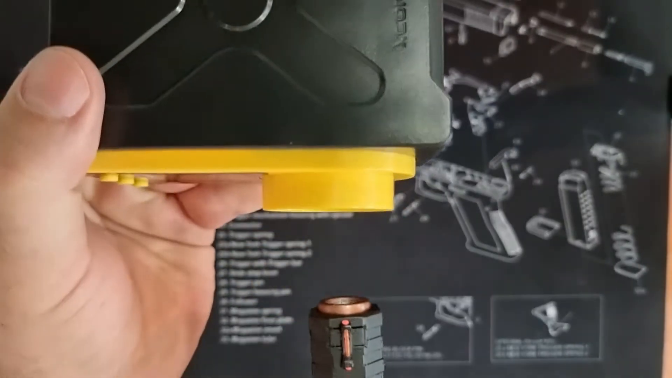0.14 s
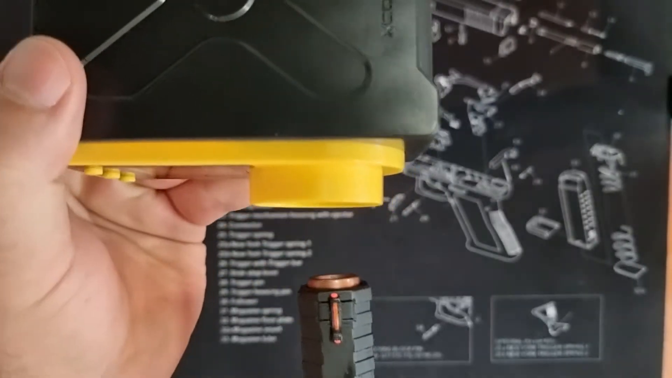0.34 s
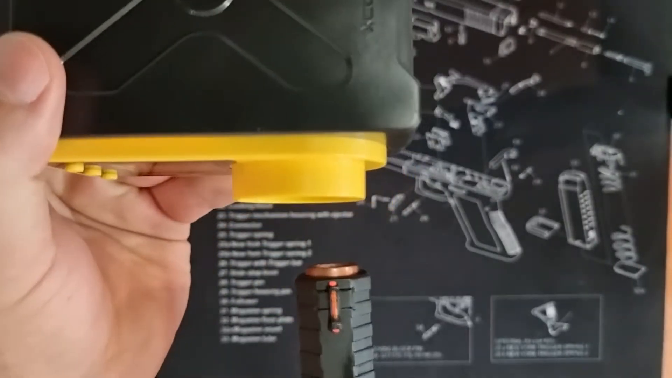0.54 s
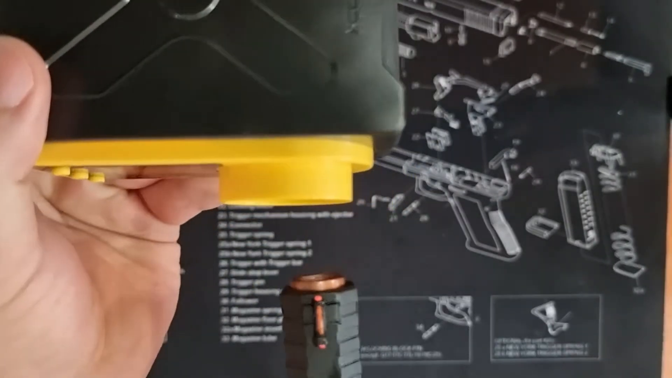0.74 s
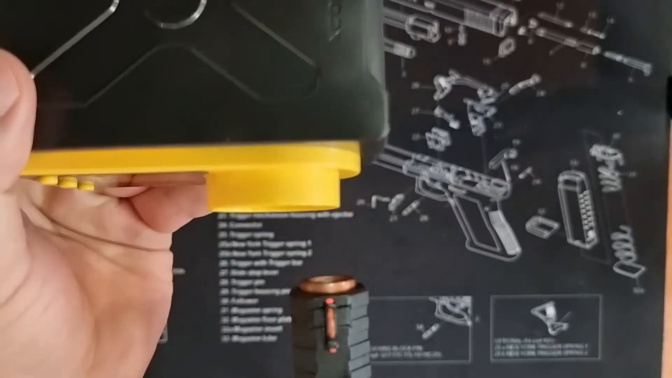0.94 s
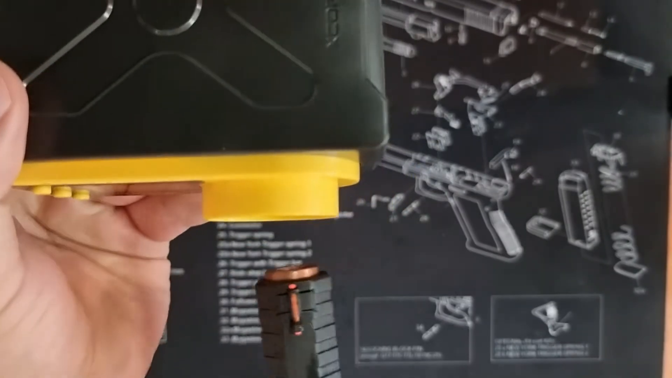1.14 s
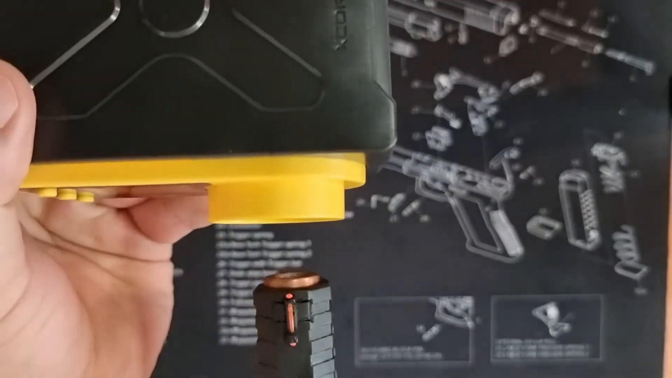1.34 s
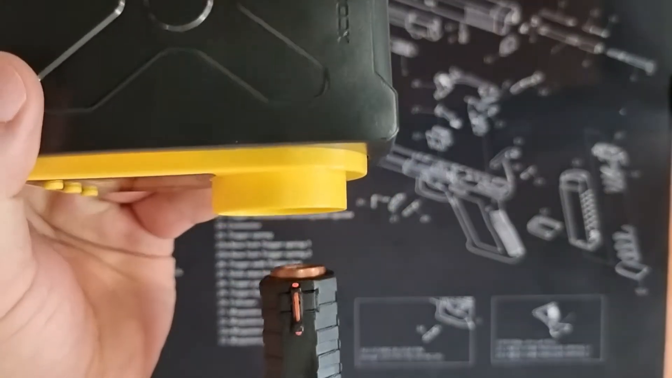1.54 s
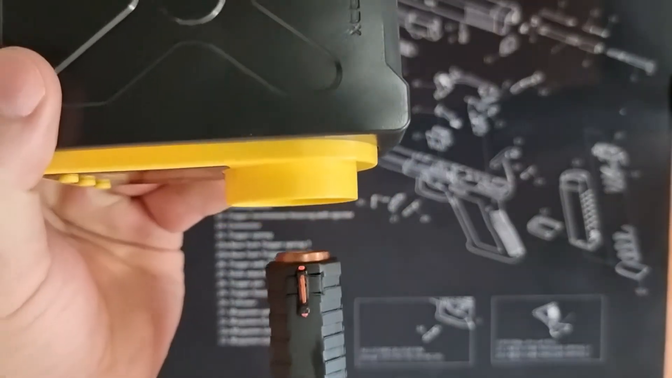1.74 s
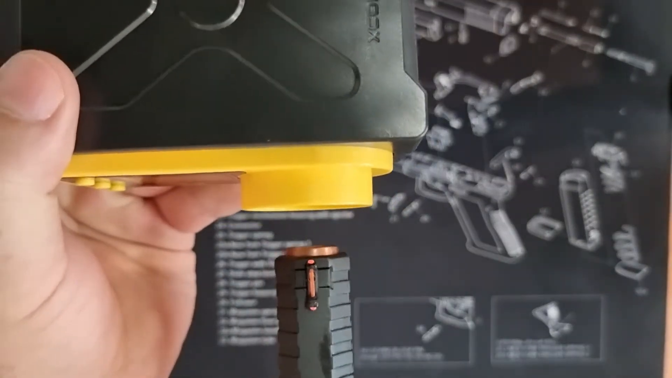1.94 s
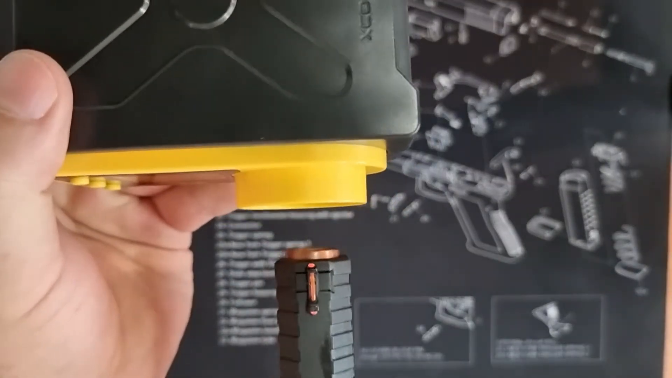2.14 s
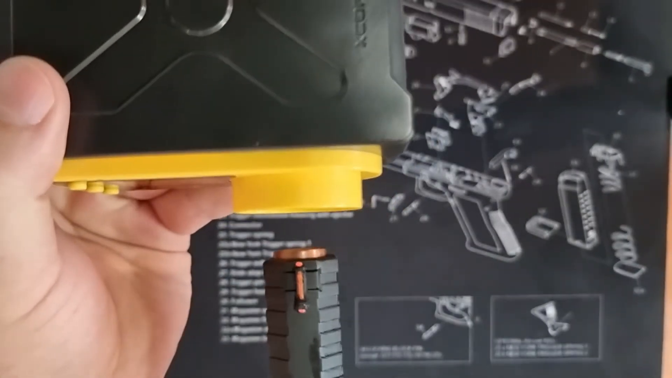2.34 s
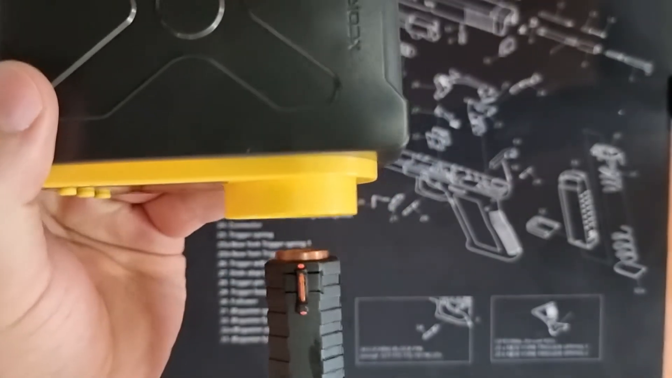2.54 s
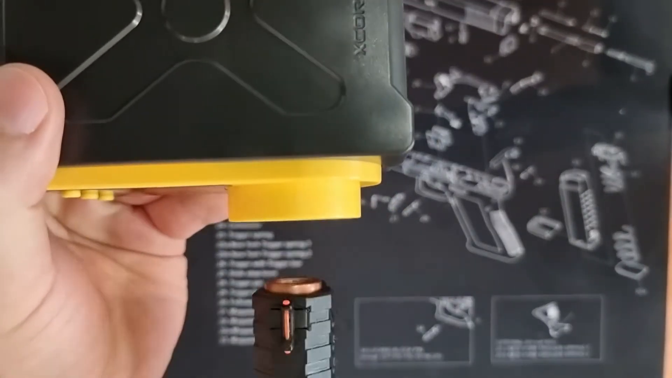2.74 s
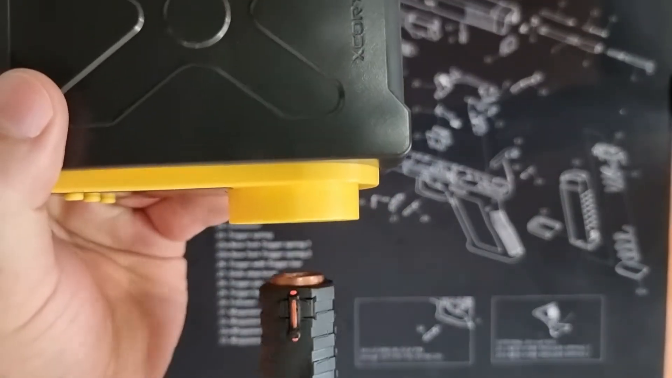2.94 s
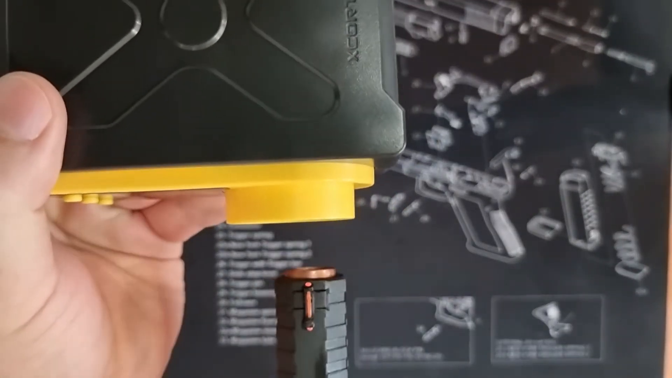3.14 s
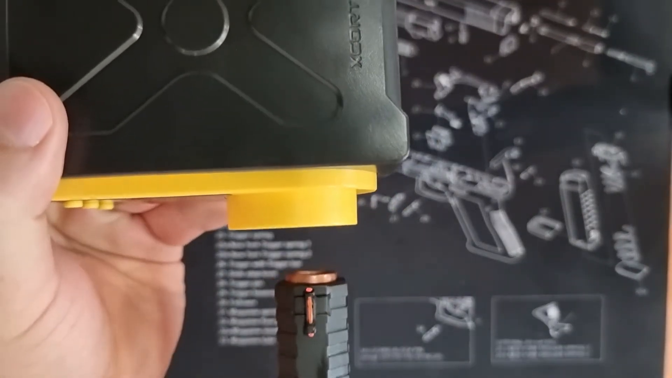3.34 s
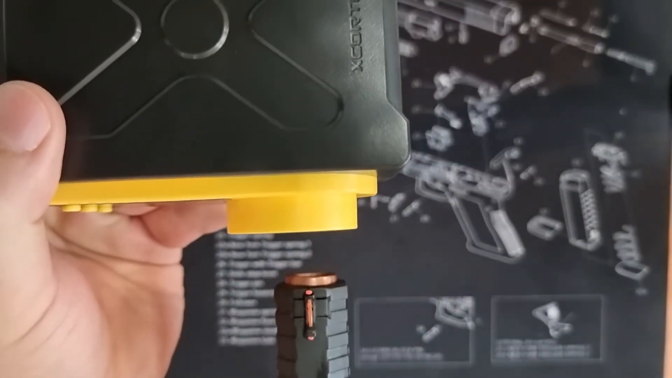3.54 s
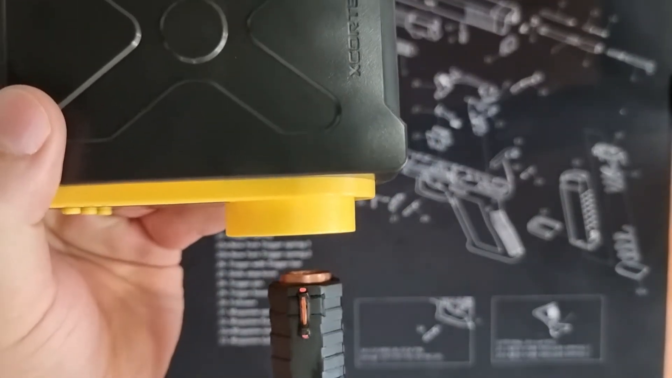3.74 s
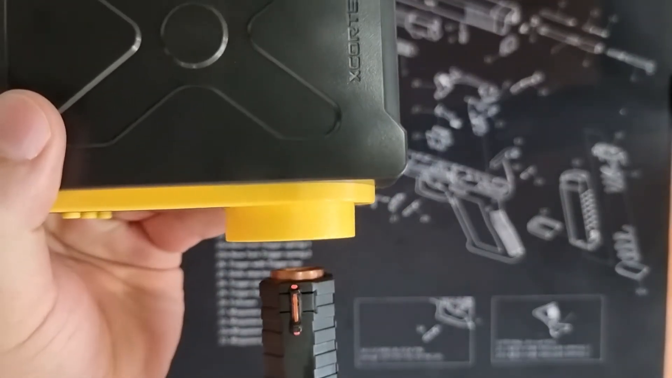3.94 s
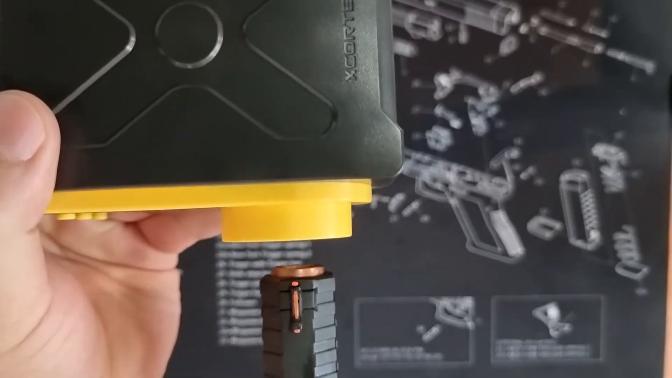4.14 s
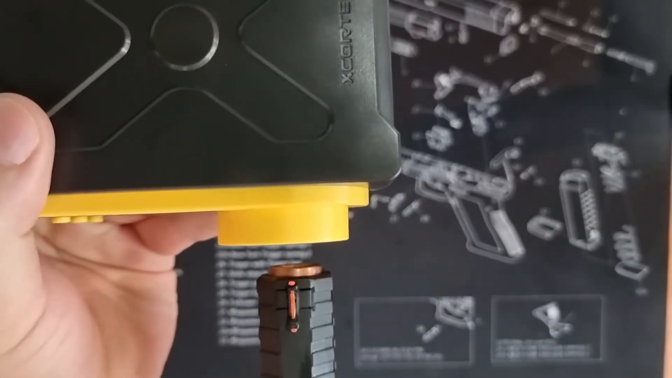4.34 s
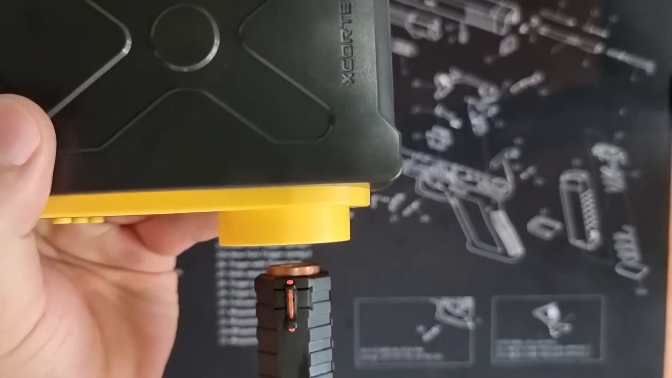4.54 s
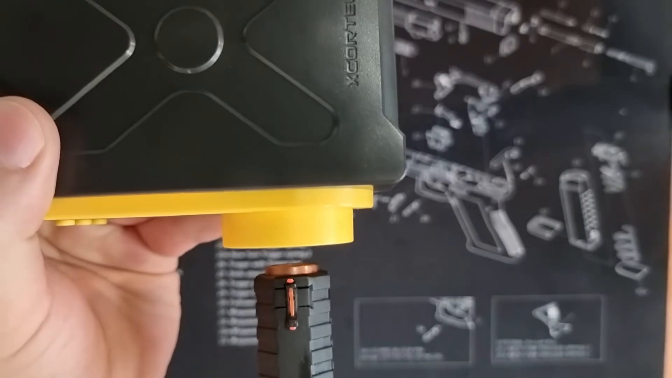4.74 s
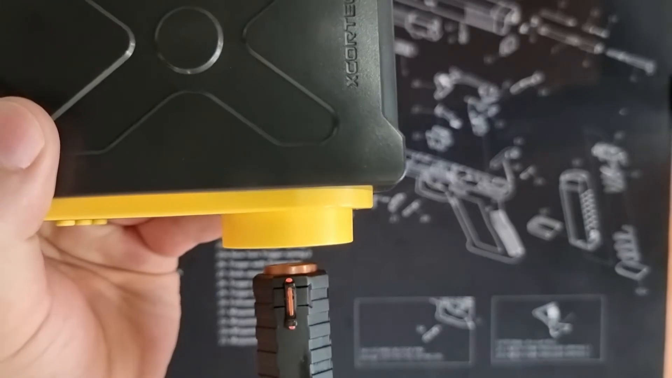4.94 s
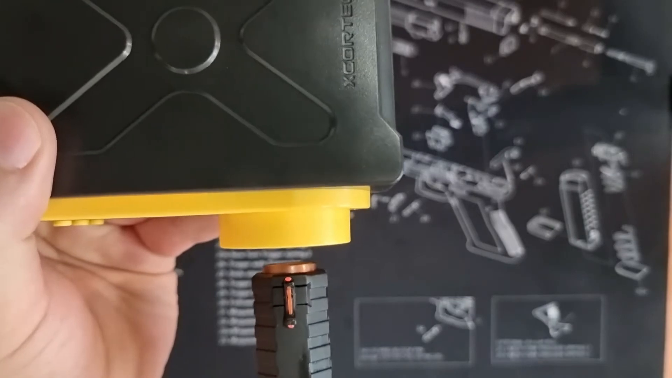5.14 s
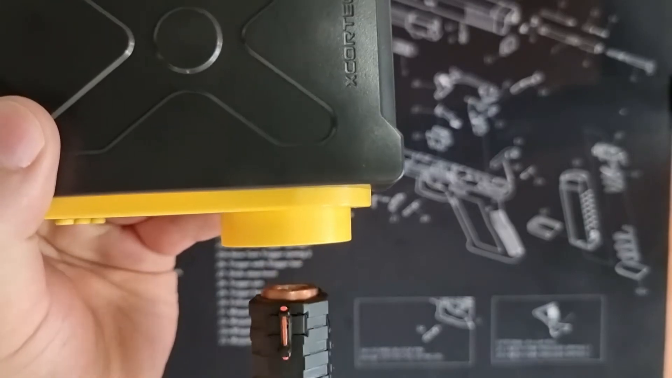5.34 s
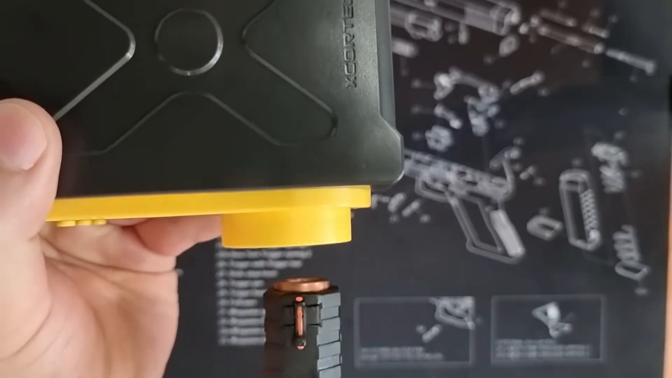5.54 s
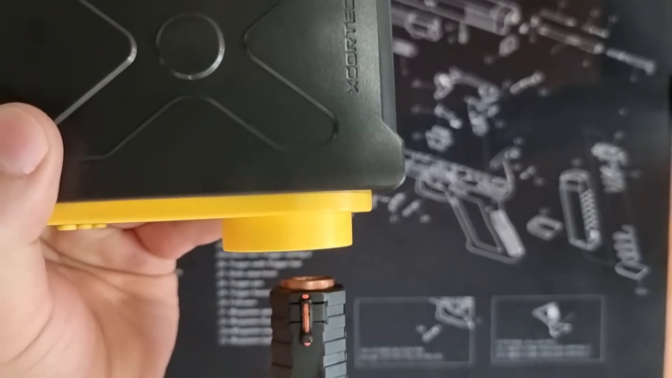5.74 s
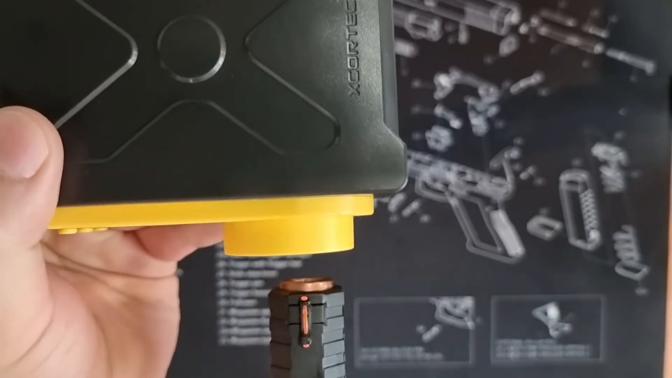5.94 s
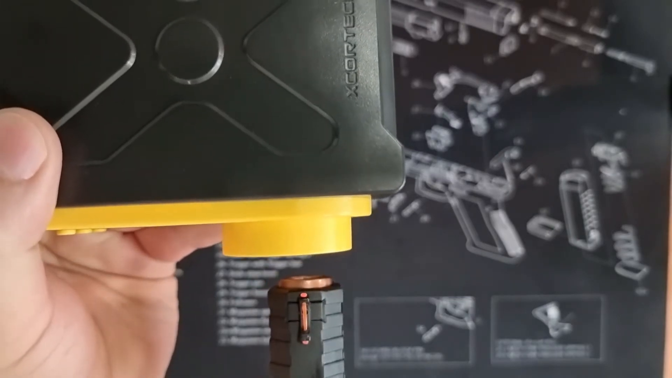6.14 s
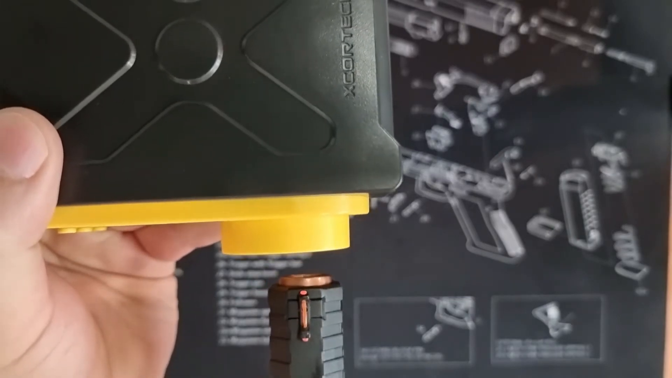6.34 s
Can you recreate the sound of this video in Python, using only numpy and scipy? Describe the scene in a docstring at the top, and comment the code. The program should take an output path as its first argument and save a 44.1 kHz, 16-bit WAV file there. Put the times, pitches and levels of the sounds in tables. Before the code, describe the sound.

A gas airsoft pistol clicks, then fires two sharp, hissing, clattering shots that ring through a hard room over a faint fan hum.

```python
"""A gas airsoft pistol is fired through a hand-held chronograph in a hard, ringing room, close to a phone.
A fan hums over room tone throughout: wandering sines and coloured noise. The trigger clicks first: ticks and rubs
ring steel resonances. At 2.55 s and 5.18 s come the shots: noise jets, slide blows that ring, puffs on the microphone
and decaying room sines. Knocks follow each; after the second the mechanism scrapes (noise bursts) and its latch clicks.
Sources excite decaying-noise echoes; the phone's gain drops on loud sound and slowly recovers."""
import sys
import numpy as np
from scipy import signal
from scipy.fft import rfft, irfft, next_fast_len
from scipy.io import wavfile
from scipy.ndimage import uniform_filter1d, map_coordinates

SR = 44100
rng = np.random.default_rng(int(sys.argv[2]) if len(sys.argv) > 2 else 0)


def dump_mix(stems):
    """Bounce the given channels to the path in sys.argv[1] as a 16-bit WAV at rate SR."""
    frames = np.atleast_2d(stems).T  # one column per channel
    limited = np.clip(frames, -1, 1)  # hard clip at full scale
    pcm = np.round(limited * 32767).astype(np.int16)
    wavfile.write(sys.argv[1], SR, pcm)


N = 281490
TIME = np.arange(N) / SR  # s

# Shots: valve fully open t/s, relative jet level/dB, open time/s, breech delay/s,
# relative breech hiss level/dB, relative boom level/dB
SHOTS = [(2.551, -12.5, 0.068, 0.044, -14, -1), (5.18, -13.5, 0.087, .054, -8, -7)]
# Left-right likeness of diffuse sound: f/Hz, likeness/1
ROOM_ALIKE = [(100, .88), (300, .3), (700, .15), (1500, .03), (16000, 0)]


def shots(ring_db=-14, wet_db=-1):
    """Gas hisses out while the slide slams back and forward and rings."""
    # Blows of valve and slide: t/s, relative level/dB
    blows = [(2.551, -8.5), (2.562, 1), (2.5695, -17), (2.576, -1.5), (2.607, -6.5), (5.179, -14),
             (5.1862, -1.5), (5.1942, -0.5), (5.2015, -5), (5.222, -14.5), (5.243, -12.5)]
    # Spectrum of jet and blows: f/Hz, relative level per Hz/dB
    gas = [(20, -10), (60, -3.5), (136, 1), (300, -6.5), (460, 1), (680, -3), (1300, -3), (1900, -6),
           (2800, -2.5), (4860, -4), (7000, -7), (9200, -11.5), (12500, -6), (15600, -10.5)]
    # Spectrum of breech hiss: f/Hz, relative level per Hz/dB
    hiss = [(4000, -31), (9000, -9.5), (12000, 1), (15500, 0)]
    # Slide modes: f/Hz, relative level/dB, t60/s
    steel_modes = [(2947, -18.5, 0.12), (3114, -7, .15), (3226, -8.5, 0.15), (3790, -9.5, .12),
                   (7830, -3.5, .1), (13900, 0, .07), (14500, 2, .07), (15570, 6, 0.064)]
    blow_t60_s = 0.016

    jet = jet_level() * noise(gas)
    cracks = strikes(blows, blow_t60_s) * noise(gas)
    report = blend(jet + cracks, ROOM_ALIKE) + breech_level() * noise(hiss)
    report = report + amp(ring_db) * ringing(report, steel_modes)
    # each shot has its own draw of diffuse echoes
    halves = [TIME < TIME[-1] / 2, TIME >= TIME[-1] / 2]
    echoes = sum(room(report * half) for half in halves)
    return report + amp(wet_db) * echoes


def jet_level():
    """The gas flow rises fast, holds while the valve is open and drains more slowly."""
    rise_db_per_s, release_db_per_s = 1452.5, 267
    level = np.zeros(N)
    for open_s, db, hold_s, *_ in SHOTS:
        before_s = np.maximum(open_s - TIME, 0)
        after_s = np.maximum(TIME - open_s - hold_s, 0)
        level += amp(db - rise_db_per_s * before_s - release_db_per_s * after_s)
    return level


def breech_level():
    """A thin hiss swells and fades as the slide uncovers the breech."""
    half_s = 0.022  # centre to 1/e
    return sum(amp(db) * np.exp(-((TIME - open_s - delay_s) / half_s) ** 2)
               for open_s, _, _, delay_s, db, _ in SHOTS)


def boom():
    """Each shot sets the room's standing waves swinging; they build up and hum on, alike at both ports."""
    # Standing waves: f/Hz, relative level/dB, t60/s
    standing_waves = [(78, -27.5, .6), (126.7, -23, .85), (154.3, -25.5, .9), (212, -27.5, 0.54),
                      (378, -34.5, 1.2), (784, -42.5, 1.1), (1095, -38.5, 1.4)]
    delay_s, build_s = 0.02, 0.031  # blast crosses the room; waves swell

    out = np.zeros(N)
    for open_s, *_, boom_db in SHOTS:
        t = np.maximum(TIME - open_s - delay_s, 0)
        waves = sum(amp(db - 60 * t / t60) * np.sin(2 * np.pi * (hz * t + rng.random()))
                    for hz, db, t60 in standing_waves)
        out += amp(boom_db) * waves * (1 - np.exp(-t / build_s))
    return out


def puffs(eddy_db=-9, spread=3.5, wet_db=-12):
    """Each puff is a quick suction, a slow rebound and a swirl of eddies, mostly on the right port."""
    # Gas striking the ports: t/s, relative level/dB, time scale/s
    gusts = [(2.545, -18, 0.00033), (2.556, -11.5, 0.0014), (2.567, -3, 0.001), (5.16, -30.5, 0.0026),
             (5.171, -10.5, 0.0014), (5.1785, -1.5, 0.0011), (5.1809, -5, 0.0012), (5.192, -12, 0.00044)]
    # Turbulence spectrum: f/Hz, relative level per Hz/dB
    eddy_spectrum = [(20, -2), (70, 1.5), (200, -1.5), (450, -3), (900, -15), (2500, -33), (16000, -71)]
    left_db = -20.5  # sheltered port

    out, eddies = np.zeros((2, N)), noise(eddy_spectrum)
    for start_s, db, scale_s in gusts:
        u = np.maximum(TIME - start_s, 0) / scale_s
        pressure = u * (u - 2) * np.exp(1 - u)
        swirl = amp(eddy_db) * np.exp(-((TIME - start_s) / (spread * scale_s)) ** 2) * eddies
        out += amp([[db + left_db], [db]]) * (pressure + swirl)
    return out + amp(wet_db) * room(out.mean(axis=0, keepdims=True))


def trigger(tick_db=-3, rub_db=-6, rub_t60_s=0.005, rub_rise_s=0.0004,
            near_db=-10, wet_db=-20, rasp_db=-17, low_hz=1200):
    """Trigger, sear and latch snap: ticks and rubs ring steel in step; a broader rasp radiates into the room."""
    # Steel contacts of trigger, sear and latch: t/s, relative level/dB
    contacts = [(.452, -44), (1.105, -8.5), (1.108, -0.5), (5.138, -31.5), (6.103, -12.5), (6.108, -15)]
    # Resonances of these parts: f/Hz, width/Hz, relative level/dB
    steel_modes = [(3030, 600, 3), (5200, 750, 2.5), (9800, 1100, -2.5), (12570, 760, 3), (14900, 1300, -3)]
    # Rub spectrum reaching the room: f/Hz, relative level per Hz/dB
    rasp_spectrum = [(800, -26), (1800, -3.5), (3000, -8), (4000, -2.5), (5000, -6), (7500, -15.5),
                     (12500, -3.5), (16000, 0)]

    ticks = np.zeros(N)
    for t_s, db in contacts:
        ticks[round(t_s * SR)] += amp(db + tick_db)
    rub = strikes(contacts, rub_t60_s, rub_rise_s)
    excitation = ticks + amp(rub_db) * rub * rng.standard_normal((2, N))

    def steel(hz):
        """In-step resonances behind a second-order high-pass."""
        modes = sum(resonances([mode], hz) for mode in steel_modes)
        return modes * (1j * hz / (low_hz + 1j * hz)) ** 2

    click = filtered(excitation, steel)
    rasp = rub * noise(rasp_spectrum)
    return click + amp(near_db) * nearby(click) + room(amp(wet_db) * click + amp(rasp_db) * rasp)


def nearby(x, span_s=0.017):
    """The table and the hands scatter a dense cluster of early echoes."""
    t = TIME[:SR // 10]
    cluster = rng.standard_normal((2, len(t))) * (t / span_s) * np.exp(-(t / span_s) ** 4)
    return signal.fftconvolve(x, cluster / np.linalg.norm(cluster[0]), axes=1)[:, :N]


def handling(rise_s=0.0025, spring_t60_s=0.43, tick_db=3, tick_t60_s=0.014, wet_db=-3):
    """Metal parts tick and scrape as they catch, a spring buzzes on, the hand bumps the case."""
    # Mechanism sliding and catching: t/s, relative level/dB
    catches = [(5.865, -34), (5.938, -39), (6.038, -45.5), (6.058, -40.5), (6.102, -35), (6.352, -51.5)]
    # Hand on the plastic case: t/s, relative level/dB
    knocks = [(3.243, -39), (6.231, -37)]
    # Scrape spectrum: f/Hz, relative level per Hz/dB
    scrape_spectrum = [(500, -31), (1400, -10), (2800, -6.5), (4500, -9.5), (7000, -10), (9000, -16),
                       (12000, -12), (14400, -11), (15800, -5.5)]
    # Spring resonances: f/Hz, width/Hz, relative level/dB
    spring_modes = [(1430, 60, -7), (4130, 320, -3.5)]
    # Case spectrum: f/Hz, relative level per Hz/dB
    case_spectrum = [(20, 2), (120, -22), (500, -19), (1500, -30), (6000, -53), (16000, -50)]
    catch_t60_s, knock_t60_s = 0.25, 0.024
    spring_db = -7.5  # re catch level

    scrape_level = strikes(catches, catch_t60_s, rise_s)
    tick_level = amp(tick_db) * strikes(catches, tick_t60_s, rise_s)
    scrape = (scrape_level + tick_level) * noise(scrape_spectrum)
    spring = amp(spring_db) * strikes(catches, spring_t60_s, rise_s) * band_noise(spring_modes)
    thuds = strikes(knocks, knock_t60_s) * blend(noise(case_spectrum), ROOM_ALIKE)
    dry = scrape + spring + thuds
    return dry + amp(wet_db) * room(dry)


def room(x, build_s=0.0051):
    """Diffuse echoes build up, swell at the room's resonances and die fastest in the treble."""
    # Decay: f/Hz, t60/s
    decay_t60 = [(60, 0.48), (150, .9), (260, 0.7), (600, 1.07), (1100, 1.276), (1800, 1.24), (2850, 1.065),
                 (3600, 0.96), (5200, 0.78), (7000, .7), (9000, 0.47), (15000, 0.2)]
    # Echo colour: f/Hz, relative level/dB
    echo_gain = [(40, -15), (130, -1), (280, 0.5), (420, 1.5), (700, -1), (1100, -1.5), (1700, -2),
                 (2900, -0.5), (4200, -3), (7000, 2), (9500, -1), (15000, 4)]
    # Room resonances: f/Hz, width/Hz, relative level/dB
    room_modes = [(76, 12.04, 5.5), (140.3, 13, 2.5), (158, 20, 5.5), (228, 39, -3.5), (390, 31, 0),
                  (1110, 73, -4), (2900, 480, -3)]

    colour = lambda hz: amp(along(echo_gain, hz)) * (1 + np.abs(resonances(room_modes, hz)))
    coloured = filtered(rng.standard_normal((2, 2 * SR)), colour)
    hz, t, bins = signal.stft(coloured, SR, nperseg=512)
    decay = amp(-60 * t / along(decay_t60, hz)[:, None])
    tail = signal.istft(bins * decay, SR, nperseg=512)[1]
    tail = blend(tail * (1 - np.exp(-TIME[:tail.shape[1]] / build_s)), ROOM_ALIKE)
    return signal.fftconvolve(x, tail / np.linalg.norm(tail[0]), axes=1)[:, :N]


def fan(air_db=-56.0, drift=0.0017, flutter_db=4.0):
    """Steady room tone and the thin tones of a fan whose speed wanders a little."""
    # Fan tones: mean f/Hz, relative level/dB
    fan_tones = [(113, -77), (226, -73), (790.5, -67)]
    # Room tone spectrum: f/Hz, relative level per Hz/dB
    air_spectrum = [(25, -26), (55, -18.5), (82, -7), (117, -0.5), (200, -4), (270, -13), (380, -8),
                    (640, -12), (790, -6), (930, -12.5), (1500, -16), (3250, -24), (4500, -34.5),
                    (7300, -41), (8400, -49), (16000, -56)]
    # Room tone left-right likeness: f/Hz, likeness/1
    air_alike = [(60, 0.86), (180, 0.92), (550, 0.62), (1650, -0.26), (4970, -0.15), (15000, 0.33)]

    warped_s = np.cumsum(1 + drift * wobble(6)) / SR
    tones = sum(amp(db + flutter_db * wobble(9)) * np.sqrt(2) * np.sin(2 * np.pi * hz * warped_s)
                for hz, db in fan_tones)
    return blend(amp(air_db) * noise(air_spectrum), air_alike) + tones


def strikes(rows, t60_s, rise_s=0.00015):
    """Envelope of (t/s, level/dB) contacts that rise quickly and die away."""
    out, t = np.zeros(N + SR), TIME[:SR]
    for start_s, db in rows:
        out[round(start_s * SR):][:SR] += amp(db - 60 * t / t60_s) * (1 - np.exp(-t / rise_s))
    return out[:N]


def ringing(x, modes):
    """x rings metal modes, which reach each port with their own phase."""
    t = TIME[:SR]
    ring = sum(amp(db - 60 * t / t60) * np.sin(2 * np.pi * (hz * t + rng.random((2, 1))))
               for hz, db, t60 in modes)
    return signal.fftconvolve(x, ring / np.linalg.norm(ring[0]), axes=1)[:, :N]


def resonances(modes, hz):
    """Response of (f/Hz, width/Hz, level/dB) resonances; neighbours swing in opposite directions."""
    return sum((-1) ** k * amp(db) * 1j * hz * width / (centre ** 2 - hz * hz + 1j * hz * width)
               for k, (centre, width, db) in enumerate(modes))


def blend(pair, alike):
    """Mix two unrelated signals to a left-right likeness by frequency."""
    turn = lambda hz: np.arccos(np.clip(along(alike, hz), -1, 1)) / 2
    mid, side = filtered(pair, lambda hz: np.array([np.cos(turn(hz)), np.sin(turn(hz))]))
    return np.array([mid + side, mid - side])


def noise(spectrum):
    """Two unrelated coloured noises of rms 1."""
    return unit(filtered(rng.standard_normal((2, N)), lambda hz: amp(along(spectrum, hz))))


def band_noise(modes):
    """Two unrelated noises of rms 1 in broad resonances."""
    return unit(filtered(rng.standard_normal((2, N)), lambda hz: resonances(modes, hz)))


def wobble(knots_per_s):
    """A smooth random curve through normal-distributed knots."""
    knots = rng.standard_normal(int(TIME[-1] * knots_per_s) + 4)
    return map_coordinates(knots, [TIME * knots_per_s])


def filtered(x, response):
    """x times a response of frequency, zero-padded."""
    size = x.shape[-1]
    m = next_fast_len(size + SR // 2)
    return irfft(rfft(x, m) * response(np.fft.rfftfreq(m, 1 / SR)), m)[..., :size]


def along(points, hz):
    """(f/Hz, value) points read on a log frequency axis."""
    f, v = np.transpose(points)
    return np.interp(np.log(hz + 1), np.log(f + 1), v)


def amp(db):
    """Decibels to gain."""
    return 10 ** (np.asarray(db) / 20)


def unit(x):
    """Scale to rms 1."""
    return x / np.sqrt(np.mean(x ** 2) + 1e-20)


def scene():
    """Everything that reaches the two microphone ports."""
    return shots() + boom() + puffs() + trigger() + handling() + fan()


def gain_control(x, threshold_db=-12, recover_db_per_s=0.29):
    """Loud sound turns the gain down at once; it creeps back steadily."""
    power = uniform_filter1d(np.mean(x ** 2, axis=0), size=SR // 40)  # 25 ms mean
    level_db = 10 * np.log10(np.abs(power) + 1e-12)
    excess_db = np.maximum(level_db - threshold_db, 0)
    creep_db = recover_db_per_s * TIME
    return x * amp(creep_db - np.maximum.accumulate(excess_db + creep_db))


def record(dry):
    """The phone ducks, clips at full scale and cuts off the top of the band."""
    top_hz, edge_hz = 15950, 50
    clipped = np.clip(gain_control(dry), -1, 1)
    return filtered(clipped, lambda hz: (1 - np.tanh((hz - top_hz) / edge_hz)) / 2)


dry = scene()
out = record(dry)
dump_mix(out)
```